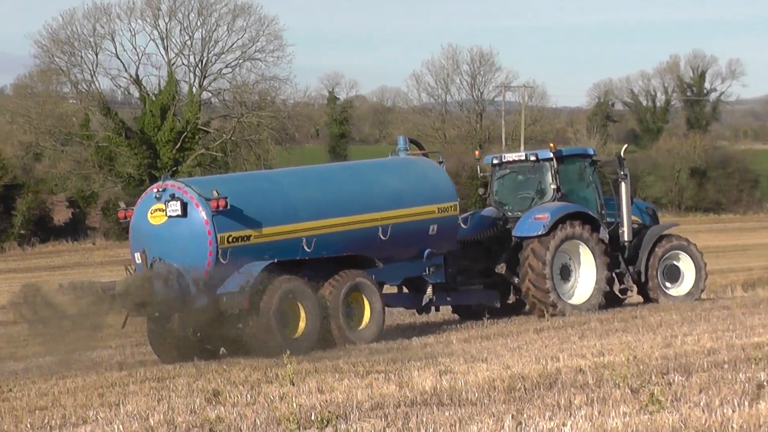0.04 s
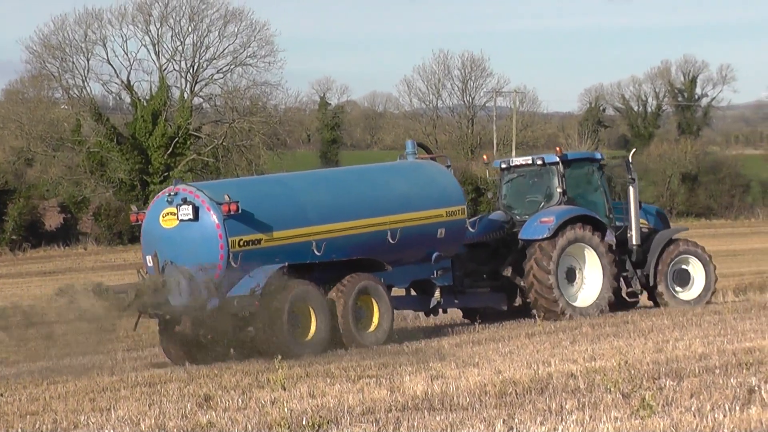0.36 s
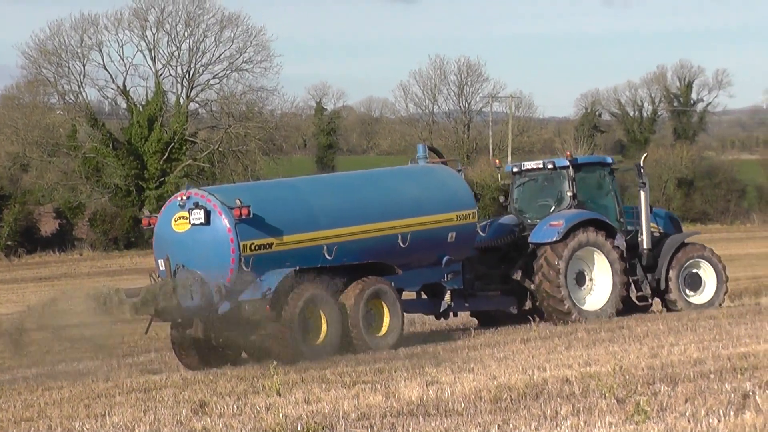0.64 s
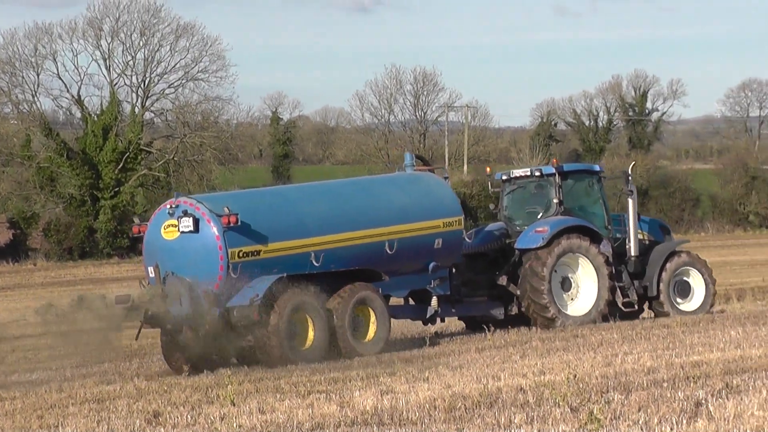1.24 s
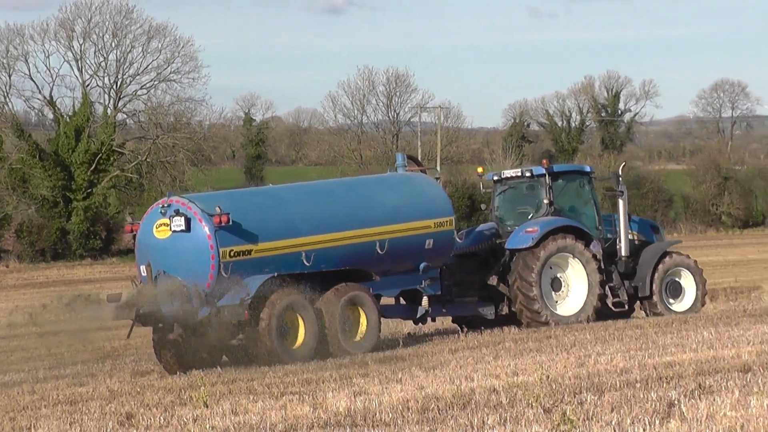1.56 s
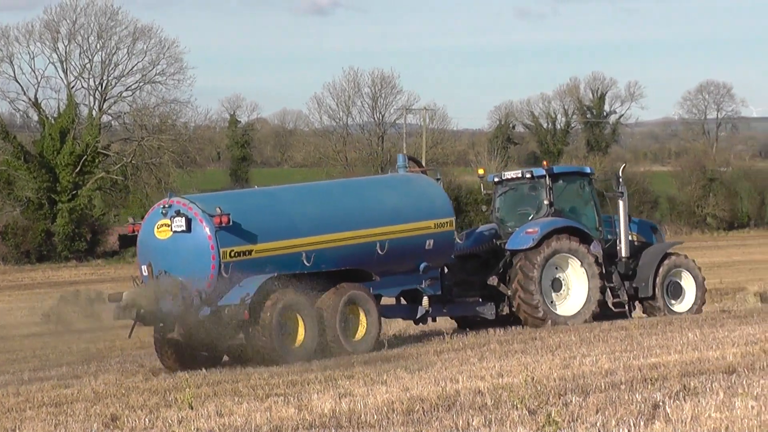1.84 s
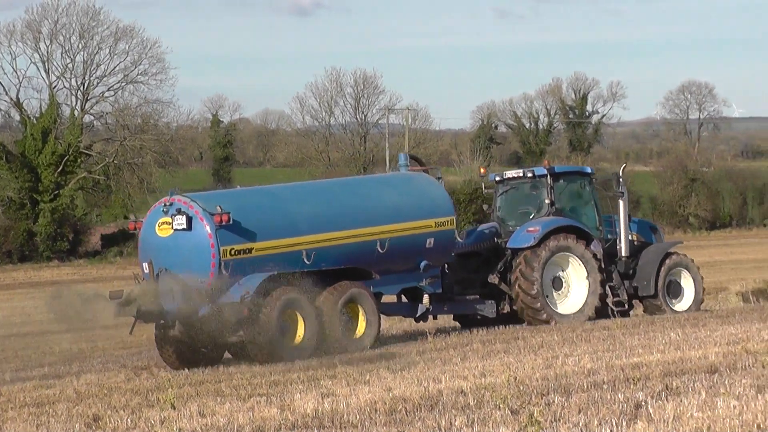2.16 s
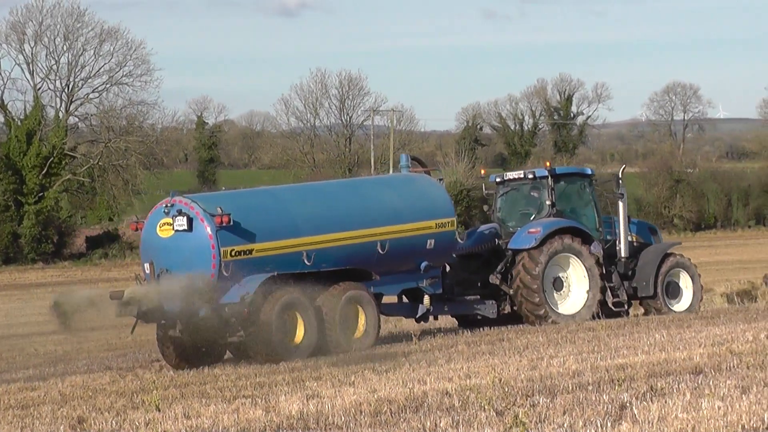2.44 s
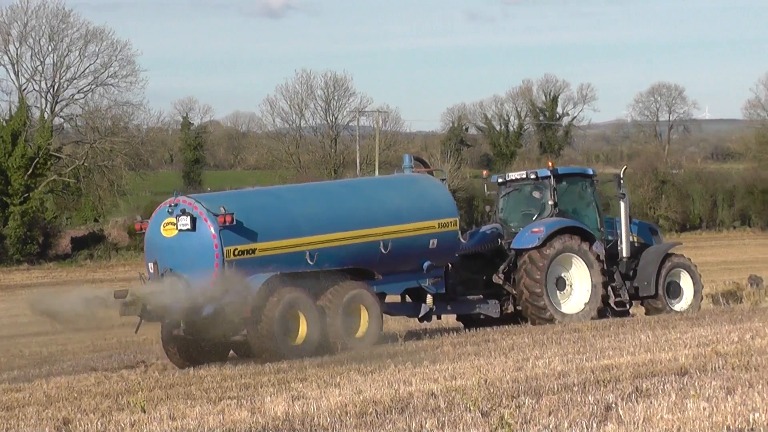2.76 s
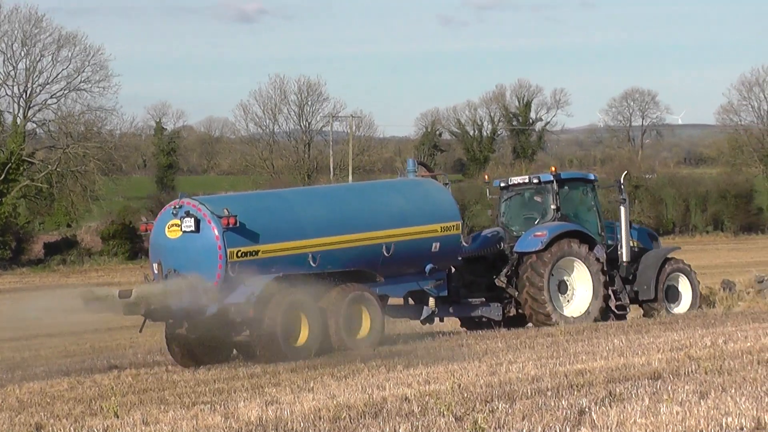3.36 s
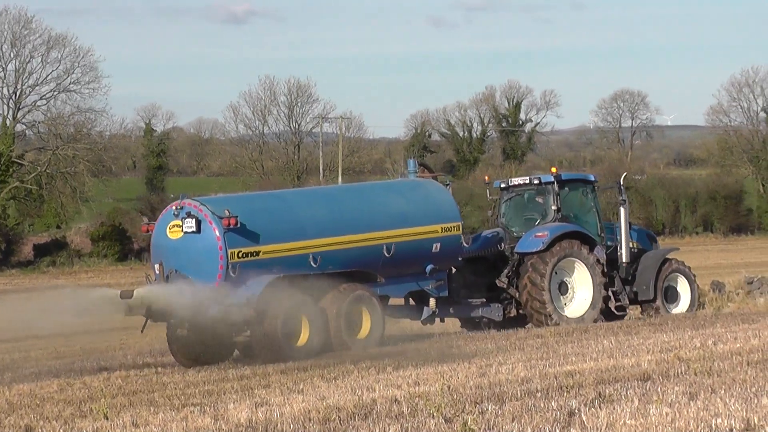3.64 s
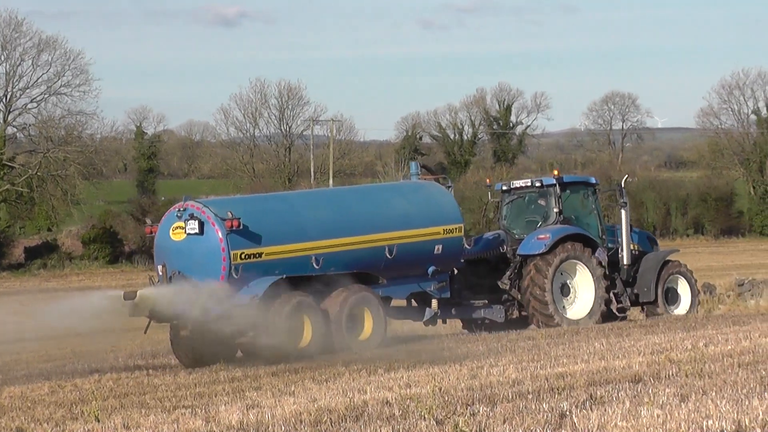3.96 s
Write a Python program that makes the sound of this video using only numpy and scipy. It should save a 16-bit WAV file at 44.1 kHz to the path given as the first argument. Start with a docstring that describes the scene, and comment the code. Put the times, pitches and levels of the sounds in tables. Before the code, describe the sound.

A tractor engine roars across a field with a pump's hum and hissing clatter, heard from a distance. Slurry sputters from the tanker in repeated gushes, growing into a continuous splattering jet as the hum dies away.

```python
"""A field, with a tractor pulling a slurry tanker some way off.
The diesel engine and the pump hum over a rough roar and a hissing clatter.
Near three seconds the load drops: the hum fades and the engine speeds up a little.
The tanker's nozzle gulps air, gushes and spits, growing into a steady spray,
and drops splatter on the stubble."""
import sys
import numpy as np
from scipy import signal
from scipy.fft import rfft, irfft
from scipy.io import wavfile
from scipy.ndimage import uniform_filter1d

SR = 44100
rng = np.random.default_rng(int(sys.argv[2]) if len(sys.argv) > 2 else 0)


def log_audio(samples):
    """Write samples as a 16-bit WAV file to the path given in sys.argv[1]."""
    # one column per channel
    frames = np.atleast_2d(samples).T
    # limit to full scale, then quantise
    limited = np.clip(frames, -1, 1)
    pcm = np.round(limited * 32767).astype(np.int16)
    wavfile.write(sys.argv[1], SR, pcm)


N = 176400
T, HZ = np.arange(N) / SR, np.fft.rfftfreq(N, 1 / SR)

# How hard the engine works. Each row: time in seconds, hum and whine gain in dB, roar gain in dB.
ENGINE_LOAD = [(0, 4, -3.5), (.3, 1, -1), (.8, 1, 0), (1.6, 0.5, 0), (2.1, 0.5, -1), (2.75, -3, -2),
               (3.15, -4.5, -1), (3.5, -17, -1.5), (4, -24, -3)]
# The hum's tones. Each row: cycles per engine turn, level in dB, waver in dB, change in dB per second.
HUM_TONES = [(2, -43, 6, 0), (4, -21.5, 1.6, -1), (6, -24.5, 2.6, -1.7), (8, -28.5, 3, 0)]
# The roar's colour (its mix of low and high). Each row: frequency in Hz, strength in dB.
ROAR_COLOUR = [(15, -48), (30, -55), (50, -21), (80, -17.5), (115, -11.5), (165, -4.5), (230, 0), (280, -2),
               (365, 0), (410, -7), (460, -12), (590, -15.5), (700, -26), (1000, -30), (2000, -34),
               (6000, -78)]


def exhaust(turns):
    """The exhaust hums and roars with the load; the roar swells at each firing, three times a turn."""
    hum = sum(tone(cycles * turns, db + change * T, waver) for cycles, db, waver, change in HUM_TONES)
    throb = 1 + 0.18 * np.cos(2 * np.pi * 3 * turns)
    roar = colour(throb * rng.standard_normal(N), ROAR_COLOUR)
    return hum * amp(curve(ENGINE_LOAD, column=1)) + roar * amp(curve(ENGINE_LOAD, column=2) - 17)


# The drone's tones. Each row: cycles per pump turn, level in dB, waver in dB, change in dB per second.
PUMP_TONES = [(1, -34.5, -0.5, -2.5), (2, -34, 0.5, -1.3)]
PUMP_RATIO, WHINE_RATIO = 1.516, 9.198  # cycles per engine turn


def pump(turns):
    """The pump is geared to the engine: a low drone, and a whine that fades as the load drops."""
    drone = sum(tone(cycles * PUMP_RATIO * turns, db + change * T, waver)
                for cycles, db, waver, change in PUMP_TONES)
    whine = tone(WHINE_RATIO * turns, db=-26.5, waver_db=1.5)
    return drone + whine * amp(curve(ENGINE_LOAD))


# The colours of the clatter and of a hiss near 5 kHz. Each row: frequency in Hz, strength in dB.
CLATTER_COLOUR = [(200, -25), (700, -1.5), (1050, -1), (1600, 2), (1900, -3), (2450, -1.5), (2850, 3),
                  (3150, -0.5), (3400, 1.5), (3650, -5), (3950, 0), (4400, -5.5), (5000, -13.5), (5600, -9),
                  (6400, -5), (8200, -9), (9500, -19), (11800, -24.5), (13500, -43), (15000, -48)]
HISS_COLOUR = [(2500, -15), (4100, -5), (4700, -2), (5400, 0), (6200, -9), (9000, -41)]
# How loud each one is. Each row: time in seconds, level in dB.
CLATTER_LOUDNESS = [(0, -25.5), (.45, -25), (.62, -23), (1, -26), (1.2, -23), (1.55, -25.5), (1.8, -24.5),
                    (2, -26), (2.9, -25.5), (3.15, -27.5), (3.6, -27), (4, -28)]
HISS_LOUDNESS = [(0, -31.5), (.6, -32.5), (1.8, -33), (2.05, -36), (2.4, -35), (2.65, -35.5), (2.85, -33),
                 (3.02, -32), (3.2, -50), (4, -60)]


def clatter():
    """Machinery knocks too densely to pick out single hits; its hiss drops out near three seconds."""
    knocks = colour(gusty(rng.standard_normal(N), patchy_db=1.3), CLATTER_COLOUR)
    hiss = colour(gusty(rng.standard_normal(N), patchy_db=1.5), HISS_COLOUR)
    flicker = amp(0.55 * drift(rate_hz=61))
    return (knocks * amp(curve(CLATTER_LOUDNESS)) + hiss * amp(curve(HISS_LOUDNESS))) * flicker


# The gushes. Each row: time of the peak in seconds, length in seconds, spray in dB, gulp in dB.
NOZZLE_GUSHES = [(0.16, 0.25, -30, -19.5), (0.44, 0.1, -28.5, -20), (0.634, 0.14, -28, -21.5),
                 (0.884, 0.17, -26, -23), (1.08, 0.079, -25.5, -18.5), (1.37, 0.15, -25.5, -29),
                 (1.653, 0.22, -25.5, -16.5), (1.956, 0.14, -24, -14.5), (2.246, 0.2, -23, -14.5),
                 (2.549, 0.12, -20, -22.5), (2.838, 0.14, -20, -17.5), (3.33, 0.15, -27, -21),
                 (3.521, 0.076, -23.5, -18.5), (3.64, 0.12, -20.5, -30), (3.76, 0.067, -24, -31),
                 (3.843, 0.066, -24.5, -23), (3.98, 0.1, -21, -39)]
# The steady jet between gushes. Each row: time in seconds, level in dB.
JET_LOUDNESS = [(0, -34), (1, -46), (2.05, -31.5), (2.35, -27), (2.72, -29.5), (3.05, -25), (3.4, -23.5),
                (3.6, -22.5), (4, -22)]
# The colours of the gulp, the spray and the hollower jet. Each row: frequency in Hz, strength in dB.
GULP_COLOUR = [(60, -45), (130, -4), (210, 7.5), (330, 7.5), (480, -7), (900, -49)]
SPRAY_COLOUR = [(150, -34), (400, -7), (600, 0), (740, -10), (950, -6), (1200, 0.5), (1400, 1), (1620, 2),
                (1900, -9), (2230, -5), (2420, -9.5), (2750, -5), (3150, -12), (4000, -12), (5000, -22),
                (6400, -17), (8200, -22), (9800, -31), (12000, -48), (15000, -70)]
HOLLOW_JET_COLOUR = [(200, -26), (420, -4), (590, 1), (710, -16), (1000, -8.5), (1200, -5), (1400, 1),
                     (1590, 1.5), (1740, -3), (1900, -14), (2080, -5.5), (2240, -4.5), (2380, -12),
                     (2550, -6), (2730, -2), (2950, -6.5), (3150, -16), (3850, -9), (4350, -16),
                     (5000, -27.5), (6400, -15.5), (8200, -22), (9800, -33.5), (12000, -31), (15000, -58)]


def nozzle():
    """Liquid leaves in sputtering gushes, each with a low gulp of air, while a steady jet grows."""
    gulp = colour(rng.standard_normal(N), GULP_COLOUR)
    sputter = unit(amp(2.2 * np.tanh(drift(rate_hz=30))))
    spray = rasp(SPRAY_COLOUR) * sputter
    out = rasp(HOLLOW_JET_COLOUR) * amp(curve(JET_LOUDNESS))
    for peak, length, spray_db, gulp_db in NOZZLE_GUSHES:
        width = length * np.where(T < peak, 0.51, 0.49)  # shares of the rise and the fall
        swell = np.exp(-abs((T - peak) / width) ** 2.4)  # a hill with a flattish top
        out += swell * (spray * amp(spray_db) + gulp * amp(gulp_db))
    return out


def rasp(spectrum):
    """Liquid tears apart in a stream of air, making a fluttering, patchy noise."""
    flutter = amp(drift(rate_hz=165))
    return colour(gusty(rng.standard_normal(N) * flutter, patchy_db=1.76), spectrum)


# The spits. Each row: start in seconds, hold in seconds, level in dB, brightness in dB per octave.
AIR_SPITS = [(0.642, 0.02, -26.5, -2), (1.396, 0.021, -23, -4), (2.222, 0.018, -29, -1),
             (2.518, 0.076, -24, -4), (2.797, 0.037, -24, 2), (3.151, 0.053, -22, -0.5),
             (3.625, 0.025, -22, 0), (3.737, 0.02, -24, -3)]
# The colour they share. Each row: frequency in Hz, strength in dB.
AIR_SPIT_COLOUR = [(300, -25), (900, -11), (1500, 0.5), (1950, -6), (2800, -1), (3400, -17), (5000, -18),
                   (7000, -14), (10000, -30), (15000, -50)]
SPIT_RISE_S, SPIT_FADE_S = 0.011, 0.0058


def spits():
    """Pockets of air burst from the nozzle: each starts sharply, holds briefly and dies fast."""
    out = np.zeros(N)
    for start, hold, db, brightness in AIR_SPITS:
        age = T - start
        rise = np.clip(age / SPIT_RISE_S, 0, 1)
        fade = np.exp(-np.maximum(age - hold, 0) / SPIT_FADE_S)
        spectrum = [(hz, level + brightness * np.log2(hz)) for hz, level in AIR_SPIT_COLOUR]
        out += amp(db) * rise * fade * colour(rng.standard_normal(N), spectrum)
    return out


# How loud the splatter is. Each row: time in seconds, level in dB.
SPLATTER_LOUDNESS = [(0, -44), (.62, -34), (1, -40), (1.15, -34), (1.5, -36), (1.75, -33), (2.3, -35),
                     (2.65, -36), (2.85, -33.5), (3.4, -37.5), (4, -36)]
# Its colour. Each row: frequency in Hz, strength in dB.
SPLATTER_COLOUR = [(500, -28), (1500, -16), (3000, 3), (5000, -2), (7500, -1), (10000, -14.5), (12500, -15),
                   (15000, -33)]
DROPS_PER_S, DROP_SPREAD_DB = 2500, 2.2


def splatter():
    """Drops of all sizes land on the stubble, each making one tiny click."""
    size = amp(DROP_SPREAD_DB * np.minimum(rng.exponential(1, N), 5))
    sign = rng.choice([-1, 1], N)
    lands = rng.random(N) < DROPS_PER_S / SR
    return amp(curve(SPLATTER_LOUDNESS)) * colour(size * sign * lands, SPLATTER_COLOUR)


def gusty(x, patchy_db):
    """Moving air makes patches of the sound louder or softer, at random pitches and times."""
    grid = signal.stft(x, nperseg=512, noverlap=384)[2]
    patches = uniform_filter1d(rng.standard_normal(grid.shape), 8, axis=0)  # smooth over pitch
    patches = uniform_filter1d(patches, 16, axis=1)  # smooth over time
    return signal.istft(grid * amp(patchy_db * unit(patches)), nperseg=512, noverlap=384)[1][:N]


# Which side is louder. Each row: frequency in Hz, left minus right in dB.
LEFT_LOUDER = [(60, 0.5), (320, -1), (500, 0.5), (740, 1), (1700, 2), (2600, 4.5), (3300, -0.5), (4000, -1),
               (4700, -1), (5700, 2), (6400, -1), (7500, 5.5), (9200, 3.5), (11500, -1.5), (14500, -1)]
# Which side hears it first. Each row: frequency in Hz, the left side's lead in radians.
LEFT_LEAD = [(0, -0.66), (780, 0.3), (1030, -0.22), (1890, -0.49), (2410, -0.75), (2670, -0.016),
             (3270, -0.31), (3700, -0.1), (4130, -0.91), (6200, -0.17), (7320, 1), (8350, -0.4),
             (9220, 0.0), (10900, -0.3), (11500, -0.0), (14200, 0.1)]
# How alike the two sides are. Each row: frequency in Hz, likeness from 0 to 1.
LIKENESS = [(60, 0.96), (150, 0.98), (370, 1), (920, 0.94), (2300, 1), (3500, 0.93), (4700, 1), (5600, 1),
            (6400, 1), (9000, 0.93), (14000, 0.99)]


def microphones(x):
    """Two close microphones hear nearly the same sound, plus a little scatter from the field."""
    t = T[:SR // 8]
    echo = unit(rng.standard_normal(len(t)) * np.exp(-t / 0.0093)) / np.sqrt(len(t))
    alike = across(LIKENESS)
    side = rfft(echo, N) * np.sqrt((1 - alike) / (1 + alike))
    lean = amp(across(LEFT_LOUDER) / 2) * np.exp(.5j * across(LEFT_LEAD))
    return irfft(rfft(x) * np.array([(1 + side) * lean, (1 - side) / lean]), N)


def tone(cycles, db, waver_db, waver_hz=4.9):
    """One tone of a turning part, wavering a little in loudness and pitch."""
    phase = 2 * np.pi * (cycles + rng.random()) + 0.075 * waver_db * drift(waver_hz)
    return amp(db) * unit(amp(waver_db * drift(waver_hz)) * np.sin(phase))


def drift(rate_hz):
    """A random wobble of size 1, moving up to about the given rate."""
    return unit(irfft(rfft(rng.standard_normal(N)) * (HZ > 0) / (1 + (HZ / rate_hz) ** 4), N))


def colour(x, spectrum):
    """Shapes the lows and highs of x by a colour table, then scales it to size 1."""
    return unit(irfft(rfft(x) * amp(across(spectrum)), N))


def across(table):
    """Reads a frequency table at every frequency, giving each octave equal room."""
    hz, value = np.transpose(table)
    return np.interp(np.log(HZ + 1), np.log(hz + 1), value)


def curve(table, column=1):
    """Reads one column of a time table at every sample."""
    columns = np.transpose(table)
    return np.interp(T, columns[0], columns[column])


def amp(db):
    """Turns decibels into a number to multiply by."""
    return 10 ** (np.asarray(db) / 20)


def unit(x):
    """Scales x so its typical size (rms) is 1."""
    return x / np.sqrt(np.mean(x ** 2) + 1e-20)


# How fast the engine spins. Each row: time in seconds, turns per second.
ENGINE_SPEED = [(0, 37.45), (.6, 37.25), (1.05, 37.25), (1.55, 37.62), (2.1, 37.5), (2.8, 37.9),
                (3.15, 39.15), (4, 39.1)]


def scene():
    """The tractor and the tanker play together, heard from one direction."""
    turns = np.cumsum(curve(ENGINE_SPEED)) / SR
    return microphones(exhaust(turns) + pump(turns) + clatter() + nozzle() + spits() + splatter())


def record(dry):
    """Cuts away the highest treble, above 14500 Hz."""
    treble_cut = signal.firwin(255, 14500, window=("kaiser", 9), fs=SR)
    return signal.oaconvolve(dry, treble_cut[None], "same")


dry = scene()
out = record(dry)
log_audio(out)
```